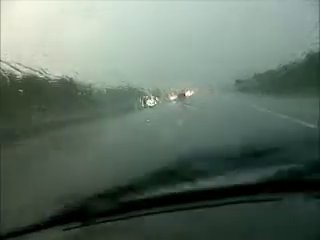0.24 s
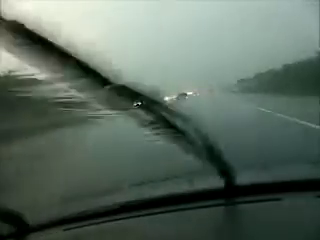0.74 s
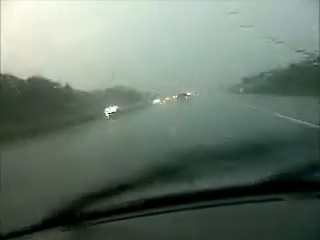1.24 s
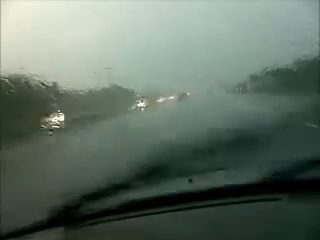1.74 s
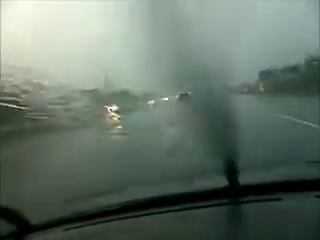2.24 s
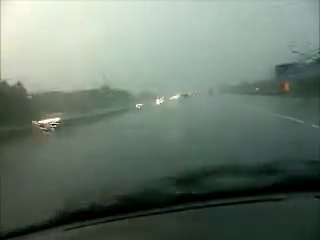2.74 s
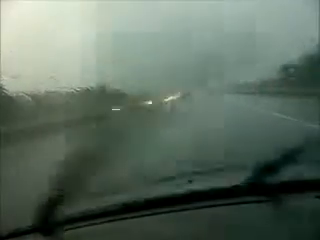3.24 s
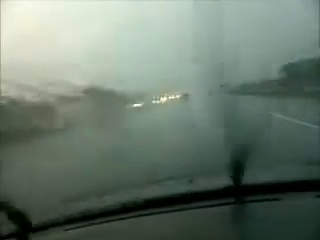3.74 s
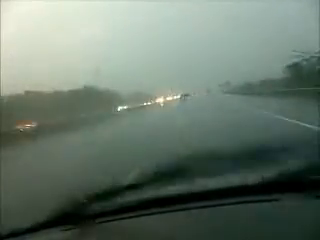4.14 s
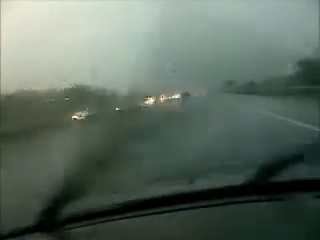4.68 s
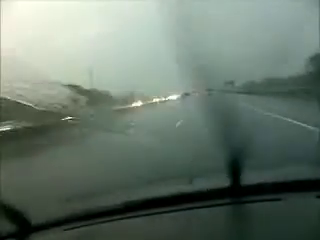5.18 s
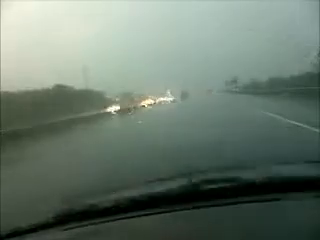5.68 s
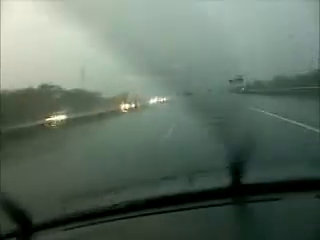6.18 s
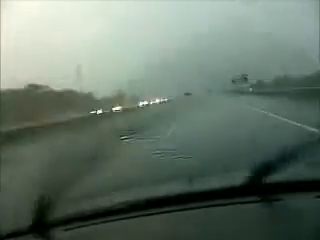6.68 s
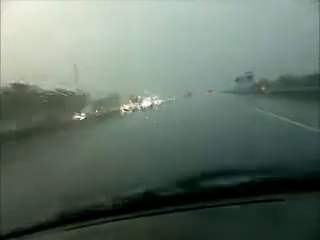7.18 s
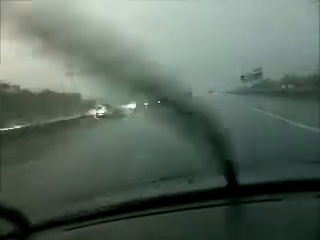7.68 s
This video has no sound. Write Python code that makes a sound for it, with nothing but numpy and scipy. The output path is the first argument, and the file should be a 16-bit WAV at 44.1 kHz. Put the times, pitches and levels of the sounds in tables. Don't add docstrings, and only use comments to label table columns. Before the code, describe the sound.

Heavy rain hammers a moving car's windscreen and roof, hard drops thudding and ticking over wet tyre rumble and a low engine drone.

```python
import sys
import numpy as np
from scipy import signal
from scipy.fft import rfft, irfft, next_fast_len
from scipy.io import wavfile
from scipy.ndimage import uniform_filter1d, map_coordinates

SR = 44100
rng = np.random.default_rng(int(sys.argv[2]) if len(sys.argv) > 2 else 0)


def unload_wav(signal):
    wavfile.write(
        sys.argv[1],
        SR,
        np.round(np.clip(np.atleast_2d(signal).T, -1, 1) * 32767).astype(np.int16),
    )


def how_loud(loudness_db):
    steps = np.asarray(loudness_db, float) / 20
    return 10 ** steps


N = 349272

# (time [s], swell [dB], half-length [s], lean to the glass [dB])
RAIN_GUSTS = [(0.041, 4.5, 0.12, -1.5), (0.546, 7.5, 0.02, -2), (1.06, 2.1, 0.16, 0),
              (1.346, 8.5, 0.055, 1.1), (1.746, 8, 0.024, 1.5), (1.978, 4.5, 0.083, -1),
              (2.277, 3, 0.028, 1.5), (2.404, 4, 0.015, 2.3), (2.58, 6.5, 0.017, -1),
              (2.909, 4.5, 0.083, -0.5), (3.296, 5, 0.037, -4), (3.598, 4.7, 0.045, -0.6),
              (3.74, 5.5, 0.043, -1.5), (3.979, 6, 0.012, -1.5), (4.527, 5, 0.043, -0.5),
              (4.809, 5.5, 0.014, -1), (5.24, 2.5, 0.074, 1.5), (5.478, 3.5, 0.042, -1.3),
              (5.955, 3, 0.06, 2.2), (6.115, 7, 0.035, -0.7), (6.332, 3.0, 0.078, -1),
              (6.768, 4.5, 0.014, -5.5), (7.246, 5.5, 0.078, -2.5), (7.632, 1.5, 0.044, 0)]
# (time [s], dip [dB], half-length [s], lean to the glass [dB])
RAIN_LULLS = [(0.233, -5.5, 0.028, -1.5), (0.317, -1.5, 0.083, 0.7), (0.502, -9, 0.03, -8.5),
              (0.891, -5.7, 0.021, 3.3), (1.165, -7.5, 0.021, 0), (1.221, -5.3, 0.019, 0.3),
              (1.437, -5, 0.062, -0.7), (2.149, -5.5, 0.058, -3.5), (2.683, -3.5, 0.065, -0.5),
              (3.223, -5.5, 0.028, -1.7), (3.368, -5.4, 0.048, 3), (3.797, -3.5, 0.034, 0.8),
              (4.184, -2.5, 0.022, -2.5), (4.431, -3.5, 0.022, 4), (4.574, -4.0, 0.032, 2),
              (4.67, -2.5, 0.017, 1), (4.962, -6.5, 0.034, -3.5), (5.098, -3.5, 0.056, -1.9),
              (5.197, -3.5, 0.024, 1.3), (5.64, -2.5, 0.018, -0.5), (5.981, -6.6, 0.025, -2),
              (6.248, -2, 0.033, 1.5), (6.588, -4, 0.028, 0.4), (6.886, 0.5, 0.0091, -7),
              (7.006, -2.5, 0.19, -0.3), (7.202, -4.5, 0.019, 0), (7.751, -4.6, 0.04, 0),
              (7.916, 2, 0.032, -7.5)]
# (time [s], fizz [dB], half-length [s])
DULL_SPELLS = [
    (.46, -3, .04),
    (5.05, -4.5, .1),
]
# (frequency [Hz], level [dB])
ROOF_SPECTRUM = [(220, -38), (300, -10), (400, -4.5), (500, -5.5), (630, -4), (800, -8), (1050, -2),
                 (1240, 0.5), (1420, -1.5), (1570, -6.5), (1700, -5.5), (2400, -9), (7000, -32)]
# (frequency [Hz], level [dB])
GLASS_SPECTRUM = [(600, -34.5), (1500, -3.5), (2200, -4), (2700, 0), (3100, 1), (3600, -2.5), (4200, -6),
                  (5000, -10), (5800, -10.5), (6800, -19), (9000, -37.5)]
# (frequency [Hz], level [dB])
SHELL_SPECTRUM = [(150, -31.5), (215, -7), (235, -11.5), (249, 3), (275, 0.5), (310, -8), (400, -10),
                  (900, -41)]
# (time [s], swell [dB], half-length [s])
SHELL_SHUDDERS = [
    (1.96, 6, 0.035),
    (2.27, 6.5, .04),
    (2.4, 7.5, 0.028),
    (3.168, 5.5, 0.034),
    (3.95, -0.5, .03),
    (4.122, 6, 0.036),
    (6.33, 3.5, .05),
    (6.7, 3.5, 0.037),
    (7.32, 7, 0.058),
]
# (time [s], level [dB])
ROAD_ROUGHNESS = [
    (0, -25),
    (.7, -25),
    (1.1, -25),
    (2.2, -29),
    (3.2, -26),
    (5, -26.5),
    (6.5, -26.5),
    (7.92, -26),
]
# (time [s], swell [dB], half-length [s])
ROAD_JOINTS = [
    (1.751, 3, 0.045),
    (3.073, 4.5, 0.041),
    (4.1, 2, 0.044),
    (4.6, 3.5, 0.041),
    (4.873, 1, 0.034),
    (5.17, 2, .04),
    (6.0, 3, .05),
]
# (frequency [Hz], level [dB])
TYRE_SPECTRUM = [(12, -38), (22, -13.5), (35, 0.5), (60, 2), (78, 2), (92, -1.5), (122, 1), (135, -1.3),
                 (150, -2), (172, -7.5), (215, -14), (300, -13), (1000, -14.5), (7000, -45.5)]
# (frequency [Hz], level [dB])
SPRAY_SPECTRUM = [(250, -25), (400, 0), (700, -0.5), (1300, -15), (3000, -9), (5000, -3.5), (6800, -12),
                  (9000, -21)]
# (time [s], firing rate [Hz], drone [dB], octave [dB])
ENGINE_COURSE = [
    (0, 80.25, -27.5, -9.5),
    (1, 81.06, -28, -6.5),
    (2, 79.9, -28.5, -4.5),
    (3, 80.22, -30.5, -4.5),
    (4, 77.67, -26.5, -16),
    (5, 78.7, -24, -14),
    (6, 79, -26.5, -18),
    (7, 77.1, -24.5, -22.5),
    (7.92, 76.6, -24.5, -18.5),
]
# (time [s], peak [dB], tick [dB])
LARGE_DROPS = [(0.258, 1.5, -6.5), (0.515, 6.5, -12), (0.617, -6.5, -10), (0.782, -4, -12.5),
               (0.926, 0, -3.5), (1.318, -1, -14.5), (1.548, -2.5, -19.5), (1.676, 7, -11.5),
               (1.797, -11, -18), (2.187, -4, -9.5), (2.739, 2.5, -14), (3.268, -0.5, -5),
               (3.567, -0.5, -5.5), (3.607, -1, -25), (3.714, -10.5, -13), (3.939, -6, -15),
               (4.539, -1, -24), (4.722, -4, 2), (4.878, 3, -9), (5.123, -4.5, -9), (5.242, -2, -2),
               (5.484, 9.5, -20), (5.704, -2, -22), (6.347, -4, -6), (6.552, -2, -6), (6.772, -0.5, -15),
               (7.249, 4, -20), (7.629, 0, -9), (7.774, -5.5, 2), (7.829, -5, -3),
               (0.163, 3, -12.5), (0.377, -3, -7), (0.663, -0.5, -7), (0.807, -2, -12.5),
                (1.037, -1.5, -4), (1.203, -6, -3.5), (1.249, 0.5, -11.5), (1.708, -3, -12.5),
                (1.931, -3, -10), (2.259, 0, -11.5), (2.33, -1.5, -10.5), (2.391, -1.5, -10),
                (2.82, -3.5, -9), (2.914, -3, -5), (3.425, -9, -3.5), (3.864, -7, -14), (4.037, -2.5, -11),
                (4.213, -4, -7), (4.283, 0, -20.5), (4.349, -2.5, -7), (4.404, -0.5, -8), (4.451, -4, -4.5),
                (4.704, -4.5, -3), (4.789, -6, -13.5), (5.004, -8, -12), (5.613, -2, -15), (5.84, -7, 1),
                (6.047, -8, -11), (7.331, 0, -13), (7.408, -0.5, -11)]
# (time [s], peak [dB], tick [dB])
ROOF_SLAPS = [
    (.532, 5.5, -21),
    (.548, 1.5, -16.5),
    (.565, 6, -19.5),
    (.582, 1, -16.5),
    (1.746, 1.5, -12.5),
    (7.265, 0, -14),
    (7.284, 4, -7),
    (7.3, 1.5, -16),
]
# (time [s], click [dB])
CLIPPED_PEAKS = [(0.0014, -77), (0.163, -29.5), (0.5326, -41.5), (1.3194, -26.5), (1.337, -37),
                 (3.5852, -32.5), (3.7479, -55.5), (6.103, -35.5), (7.2638, -35), (7.6297, -51),
                 (7.6306, -26.5), (7.9164, -31)]


def unit(x):
    return x / np.sqrt(np.mean(x ** 2) + 1e-20)


def curves(rows):
    s, *cols = np.transpose(rows)
    return [np.interp(np.arange(N) / SR, s, c) for c in cols]


def wobble(rate):
    return map_coordinates(rng.standard_normal(N // 100), [np.arange(N) * rate / SR])


def bells(s, height, half_s):
    t = np.arange(0, N + 64, 64) / SR
    late = t - s[:, None]
    flank = np.maximum(half_s, .008)[:, None]
    return np.interp(np.arange(N) / SR, t, height @ np.exp(-.5 * (late / flank) ** 2))


def coloured(x, spectrum):
    m = 2 * next_fast_len(N // 2 + 4096)
    f, db = np.transpose(spectrum)
    hz = np.fft.rfftfreq(m, 1 / SR)
    gain = how_loud(np.interp(np.log(hz + 1), np.log(f), db))
    cepstrum = irfft(np.log(gain), m)
    cepstrum[1:m // 2] *= 2
    cepstrum[m // 2 + 1:] = 0
    return irfft(rfft(x, m) * np.exp(rfft(cepstrum)), m)[:N]


def splashes(times, sizes, t60, lead):
    t = np.arange(900) / SR
    shape = rng.standard_normal((len(times), len(t))) * how_loud(-60 * t / t60)
    shape[:, 0] = lead
    shape *= (sizes / np.linalg.norm(shape, axis=1))[:, None]
    index = np.round(times * SR).astype(int)[:, None] + np.arange(len(t))
    return np.bincount(index.ravel(), shape.ravel(), N + SR)[:N]


def downpour():
    s, db, half_s, lean_db = np.transpose(RAIN_GUSTS + RAIN_LULLS)
    deepening = np.where(db < 0, 1.25, 1)
    return bells(s, db * deepening, half_s), bells(s, lean_db, half_s)


def draw_drops(swell_db, pour_db, count):
    middling_db, spread_db = 6.5, 5
    tick_db, tick_spread_db = -5, 0.5
    s = rng.random(count) * (N - 1) / SR
    size, tick = rng.standard_normal((count, 2)).clip(-2, 1.5).T
    db = pour_db + swell_db[(s * SR).astype(int)] + middling_db + spread_db * size
    chance = np.transpose([s, db, tick_db + tick_spread_db * tick])
    return np.vstack([LARGE_DROPS, ROOF_SLAPS, chance])


def volleys(leaders, decay_s, led, grows, stray, count):
    when, size = rng.random((count, 2)).T
    jumps = np.bincount((when * N).astype(int), stray * size ** 2, N)
    jumps += np.bincount((leaders[:, 0] * SR).astype(int), led * how_loud(grows * leaders[:, 1]), N)
    gain = 1 + signal.lfilter([1], [1, -np.exp(-1 / (decay_s * SR))], jumps)
    return gain / uniform_filter1d(gain, SR // 8)


def patter(spread_db, wash_db, t60, count):
    when, size = rng.random((count, 2)).T
    near = splashes(when * N / SR, how_loud(spread_db * size ** 2), t60, lead=5.65)
    return unit(near) + how_loud(wash_db) * rng.standard_normal(N)


def patchy(x, depth_db):
    z = signal.stft(x, nperseg=512)[2]
    field = uniform_filter1d(rng.standard_normal(z.shape), size=5, axis=0)
    field = uniform_filter1d(field, size=6, axis=1)
    return unit(signal.istft(z * how_loud(depth_db * unit(field)), nperseg=512)[1][:N])


def fizz(x, swell_db):
    edge_hz, follows, memory_s = 4300, 0.37, 0.59
    top = signal.sosfilt(signal.butter(2, edge_hz, "high", fs=SR, output="sos"), x)
    top_db = follows * uniform_filter1d(swell_db, int(memory_s * SR)) + bells(*np.transpose(DULL_SPELLS))
    return x + (how_loud(top_db) - 1) * top


def rain(swell_db, lean_db, heavy, pour_db):
    level_db = pour_db + swell_db
    glass_db = -4.5 + lean_db + 0.06 * wobble(12)
    clumps = volleys(heavy, 0.0068, led=0.6, grows=0.28, stray=0.39, count=200)
    roof_db = level_db + 10 * np.log10(np.clip(1 - how_loud(2 * glass_db), .05, 1))
    roof = coloured(clumps * patter(10.5, -0.82, 0.018, count=3500), ROOF_SPECTRUM)
    glass = coloured(clumps * patter(14, -2.0, 0.017, count=6000), GLASS_SPECTRUM)
    roof = how_loud(roof_db - 2.5) * patchy(roof, depth_db=1.0)
    return roof + how_loud(level_db + glass_db - 1.0) * fizz(patchy(glass, depth_db=1.0), swell_db)


def shell(swell_db):
    level_db = -31 + 0.41 * swell_db + bells(*np.transpose(SHELL_SHUDDERS)) + 0.5 * wobble(7)
    return how_loud(level_db) * unit(coloured(rng.standard_normal(N), SHELL_SPECTRUM))


def road(swell_db):
    level_db = curves(ROAD_ROUGHNESS)[0] + bells(*np.transpose(ROAD_JOINTS))
    rumble = unit(coloured(rng.standard_normal(N), TYRE_SPECTRUM))
    spray = unit(coloured(rng.standard_normal(N), SPRAY_SPECTRUM))
    spray_db = -35 + 0.63 * swell_db + 1.9 * wobble(3)
    return how_loud(level_db + 4.5 + 0.75 * wobble(5)) * rumble + how_loud(spray_db) * spray


def engine():
    hz, db, octave_db = curves(ENGINE_COURSE)
    turn = 2 * np.pi * np.cumsum(hz + 0.34 * wobble(6)) / SR
    first = how_loud(1.2 * wobble(11)) * np.sin(turn)
    second = how_loud(octave_db + 2.5 * wobble(4)) * np.sin(2 * turn)
    third = how_loud(-12.5 + 3 * wobble(4)) * np.sin(3 * turn)
    return np.sqrt(2) * how_loud(db) * (first + second + third)


def heavy_drops(heavy):
    s, db, tick_db = heavy.T
    thud = coloured(splashes(s + .0008, how_loud(db), 0.012, lead=7.3), ROOF_SPECTRUM)
    tick = coloured(splashes(s + 0.001018, how_loud(db + tick_db), 0.048, lead=8.3), GLASS_SPECTRUM)
    return how_loud(19.5) * thud + how_loud(25.5) * tick


def panel():
    mode_hz, width_hz = 1240, 350
    s, db, _ = np.transpose(ROOF_SLAPS)
    blows = splashes(s, how_loud(db + 12), .04, lead=4)
    return signal.lfilter(*signal.iirpeak(mode_hz, mode_hz / width_hz, fs=SR), blows)


def scene():
    pour_db = -14.5
    swell_db, lean_db = downpour()
    heavy = draw_drops(swell_db, pour_db, count=70)
    weather = rain(swell_db, lean_db, heavy, pour_db) + heavy_drops(heavy) + panel()
    return (weather + shell(swell_db) + road(swell_db) + engine())[None]


def roll_off(x):
    return signal.sosfilt(signal.butter(12, 15800, fs=SR, output="sos"), x)


def record(dry):
    top_hz = 7055
    held = dry / (1 + np.abs(dry / .9) ** 5) ** (1 / 5)
    hz = np.fft.rfftfreq(N, 1 / SR)
    narrow = irfft(rfft(held) * how_loud(-np.clip((hz - top_hz + 150) / 9, 0, 120)), N)
    s, db = np.transpose(CLIPPED_PEAKS)
    index = np.minimum(np.round((s + 0.00074) * SR).astype(int), N - 1)
    clicks = np.bincount(index, how_loud(db + 12.5), N)
    return roll_off(narrow + clicks)


dry = scene()
out = record(dry)
unload_wav(out)
```